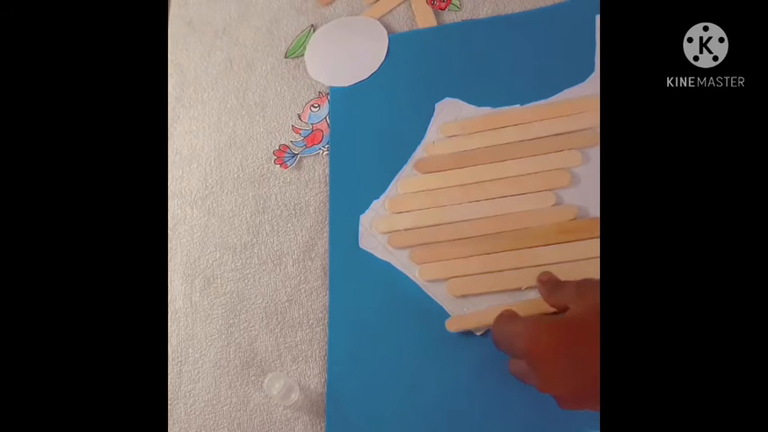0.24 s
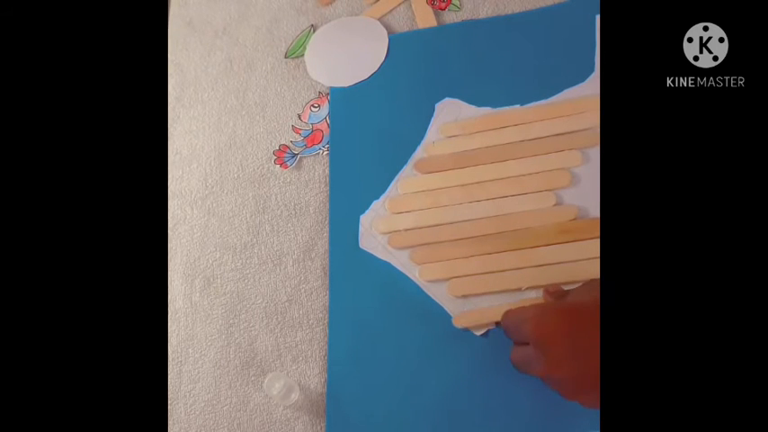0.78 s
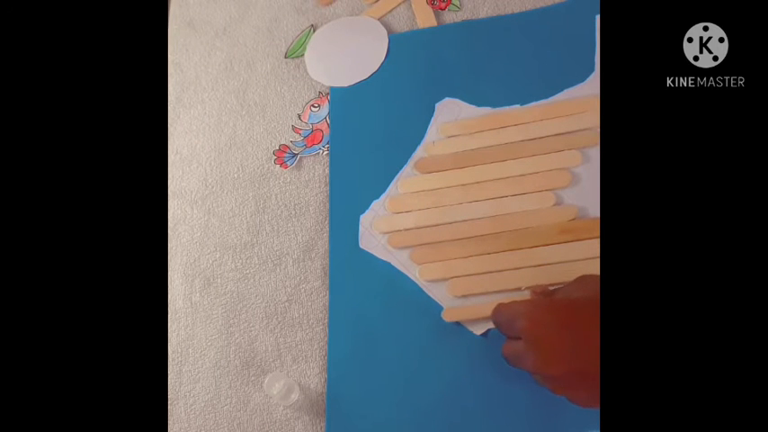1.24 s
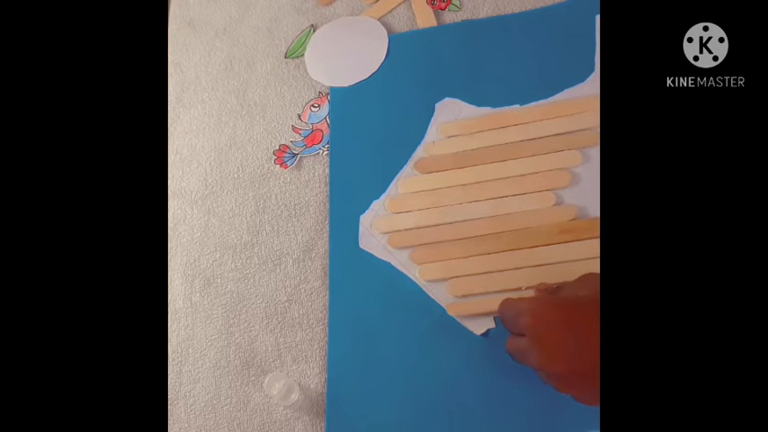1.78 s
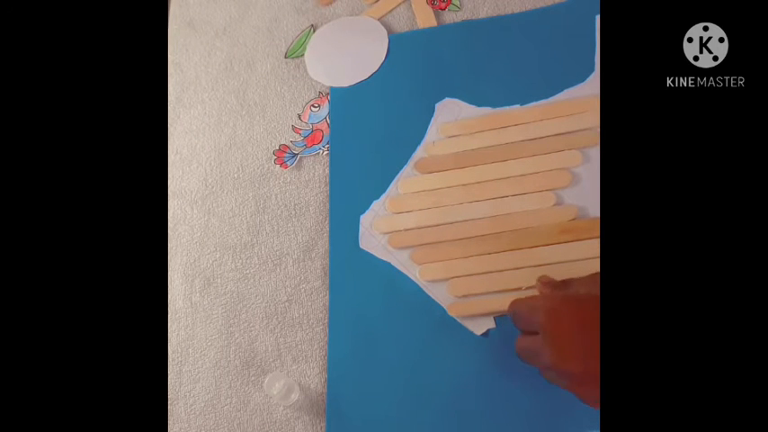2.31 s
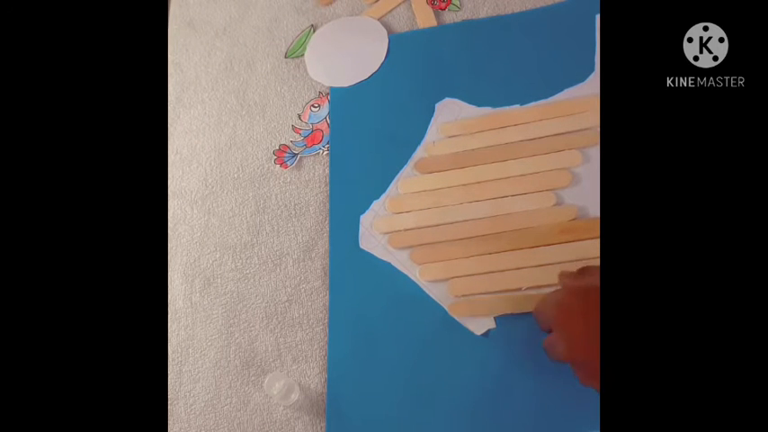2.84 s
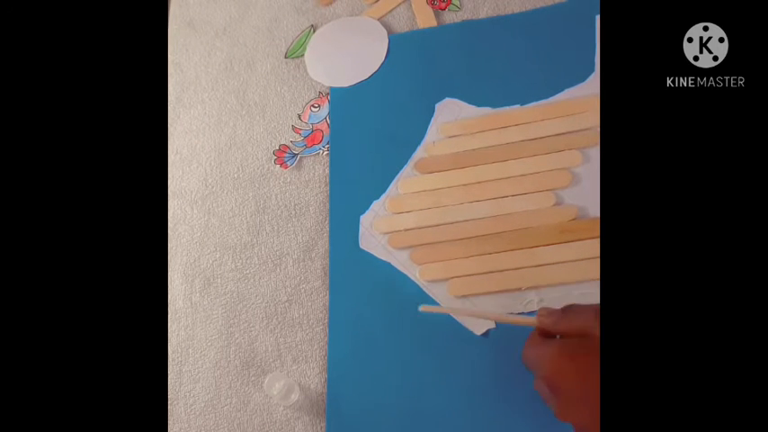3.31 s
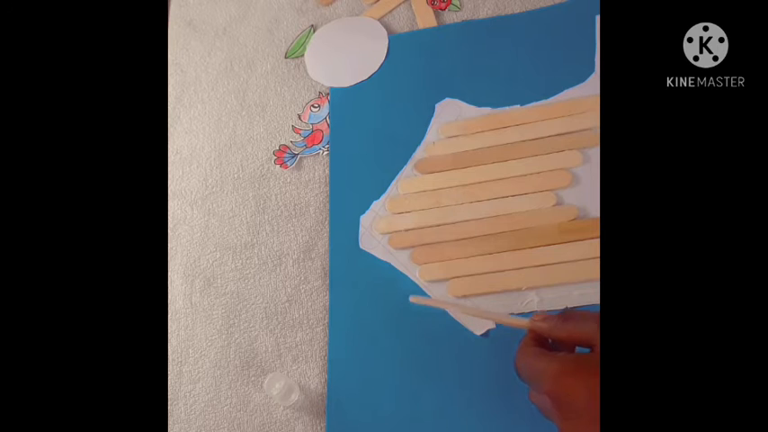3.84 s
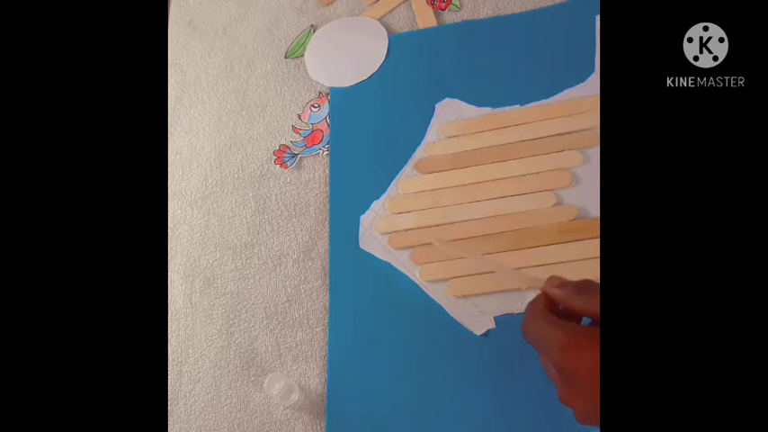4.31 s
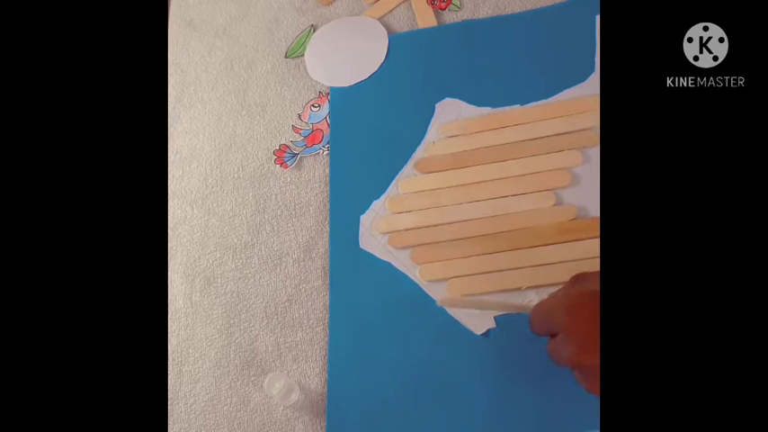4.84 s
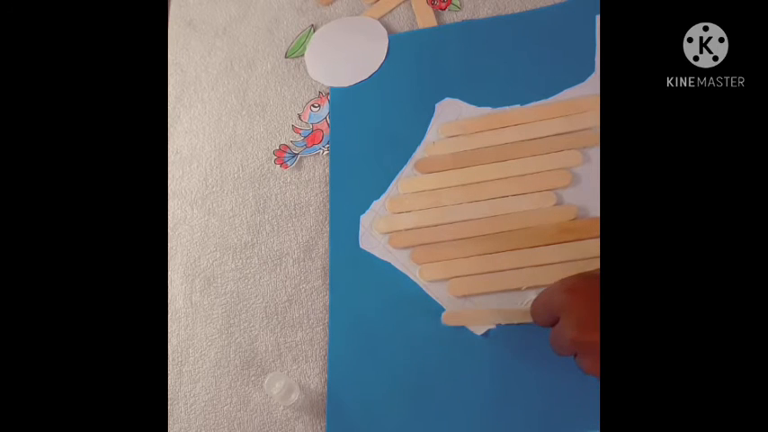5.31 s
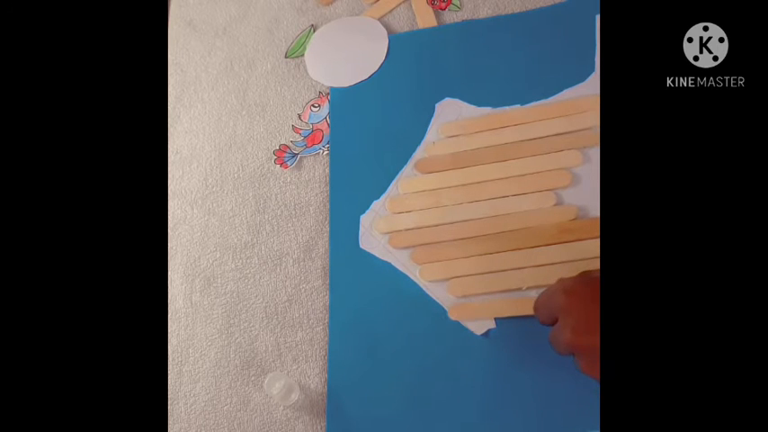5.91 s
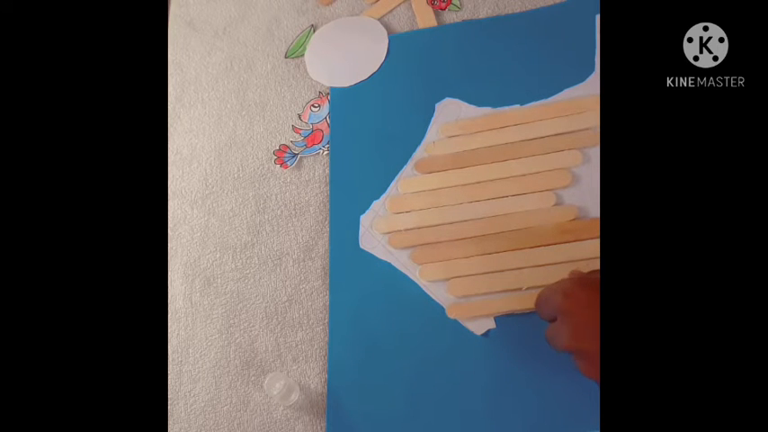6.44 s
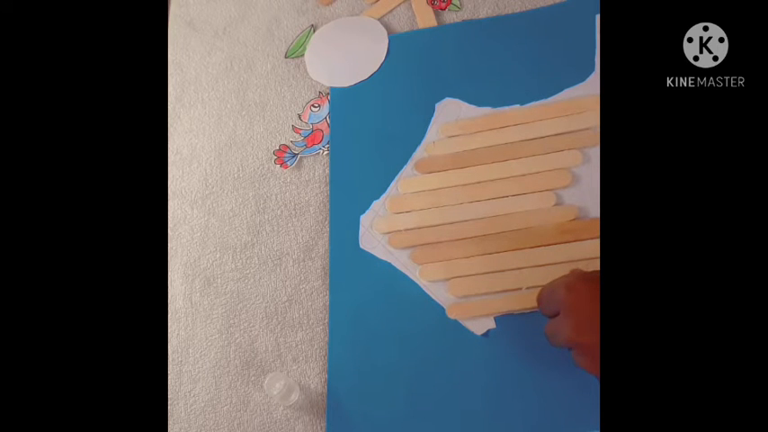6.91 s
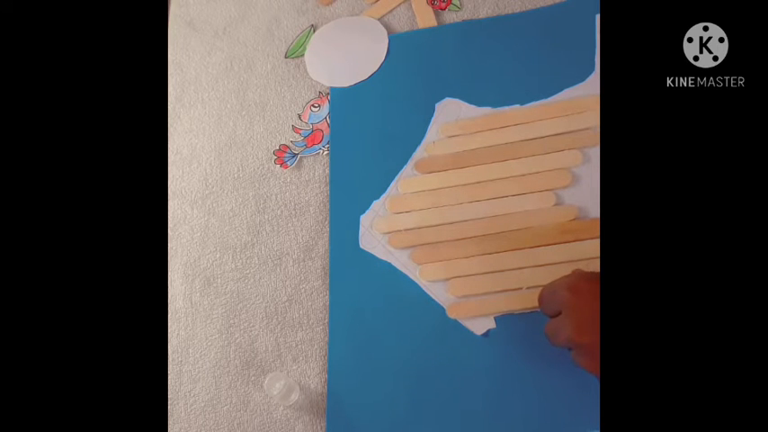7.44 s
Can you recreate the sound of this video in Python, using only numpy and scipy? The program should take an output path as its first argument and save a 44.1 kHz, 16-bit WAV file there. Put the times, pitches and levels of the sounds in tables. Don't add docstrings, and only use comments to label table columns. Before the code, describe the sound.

A steady raspy mains buzz with fan hiss and thin whine fills a quiet room while light wooden sticks scrape, click, tap and sharply snap.

```python
import sys
import numpy as np
from scipy import signal
from scipy.fft import rfft, irfft, next_fast_len
from scipy.io import wavfile
from scipy.ndimage import uniform_filter1d, map_coordinates

SR = 44100
rng = np.random.default_rng(int(sys.argv[2]) if len(sys.argv) > 2 else 0)


def convert_level_to_amplitude(level_db):
    exponent = np.asarray(level_db, float) / 20
    return 10 ** exponent


def master(y):
    cut = np.clip(np.atleast_2d(y).T, -1, 1)
    pcm = np.round(cut * 32767)
    wavfile.write(sys.argv[1], SR, pcm.astype(np.int16))


N = 338247


def unit(x):
    return x / np.sqrt(np.mean(x ** 2) + 1e-20)


def wobble(rate, size=N):
    knots = rng.standard_normal(int(size * rate / SR) + 4)
    return map_coordinates(knots, [np.arange(size) * rate / SR])


def filtered(x, response):
    m = next_fast_len(len(x) + 4096)
    return irfft(rfft(x, m) * response(np.fft.rfftfreq(m, 1 / SR)), m)[:len(x)]


def resonance(centre_hz, width_hz):
    return lambda f: 1j * f * width_hz / (centre_hz ** 2 - f * f + 1j * f * width_hz)


def shaped(points):
    hz, db = np.transpose(points)
    return lambda f: convert_level_to_amplitude(np.interp(np.log(f + 1), np.log(hz), db)) * np.sqrt(SR / 2)


def add(track, s, x):
    track[round(s * SR):][:len(x)] += x


def arch(length):
    return np.sin(np.pi * np.linspace(0, 1, round(length * SR)) ** .5) ** .65


def mains():
    # time_s, mains_hz
    drift = [(0, 49.9492), (1.4, 49.948), (3.3, 49.9469), (5, 49.9477), (7, 49.9493), (7.67, 49.9506)]
    start_cycle = .1045
    return start_cycle + np.cumsum(np.interp(np.arange(N) / SR, *np.transpose(drift))) / SR


def since(start_ms, jitter_ms):
    cycle = mains() + 1.02 - start_ms / 20
    late = jitter_ms * rng.standard_normal(int(cycle[-1]) + 1)
    return (cycle % 1 - .02) * 20 - late[cycle.astype(int)]


def during(start_ms, length_ms):
    ms = since(start_ms, 0)
    inside = (ms > 0) & (ms < length_ms)
    return uniform_filter1d(inside.astype(float), size=12)


def buzz():
    charge_ms = [19.04, 2.0, 10.62]
    # length_ms, size_mv, skew
    charge = [(3.39, 56.5, 0.72), (3.8, -47, 0.74), (4.06, 41.5, 0.71)]
    switch_ms = [18.972, 10.653, 2.34, 5.45, 15.41, 15.585, 12.332, .58, .85, 12.028, 1.448, 12.565, 15.8]
    # size_mv, rise_ms, decay_ms, jitter_ms
    spikes = [(-108, 0.039, 0.13, 0.0023), (-69, 0.043, 0.22, 0.0024), (81.5, 0.063, 0.15, 0.0028),
              (13, 0.025, 9.1, 0.049), (18, 0.0077, 0.071, 0.0057), (36, 0.044, 0.16, 0.006),
              (-18, .012, 0.031, 0.015), (-29, 0.058, 0.2, 0.0091), (-20, 0.056, 0.15, 0.0077),
              (-26, 0.045, 0.15, 0.01), (7, 0.012, 0.26, 0.013), (-22, 0.17, 11, 0.016),
              (-11, 0.03, 0.095, 0.011)]
    needle_ms = [2.335, 12.355, 1.83, 11.82, 1.485, 11.49, 5.43, 19.37]
    # size_mv, jitter_ms
    needles = [(-10.5, 0.016), (-12, 0.0064), (3.5, .008), (-1.5, 0.0068), (0, .008), (9, .008), (-4, .015),
               (-14.5, .01)]
    sine_mv, sine_crest_ms, needle_width_ms = 6.5, 8.19, .0094

    mv = sine_mv * np.cos(2 * np.pi * (mains() - sine_crest_ms / 20))
    for start, (length, size, skew) in zip(charge_ms, charge):
        share = np.clip(since(start, 0) / length, 0, 1)
        mv += size * np.sin(np.pi * share ** skew) ** 2
    for start, (size, rise, decay, jitter) in zip(switch_ms, spikes):
        ms = np.maximum(since(start, jitter), 0)
        mv += size * (1 - np.exp(-ms / rise)) ** 2 * np.exp(-ms / decay)
    for start, (size, jitter) in zip(needle_ms, needles):
        mv += size * np.exp(-(since(start, jitter) / needle_width_ms) ** 2)
    return (mv - mv.mean()) / 1000 * convert_level_to_amplitude(.15 * wobble(6))


def air():
    # pitch_hz, level_db per Hz
    fan = [(15, -78), (80, -79), (130, -72.5), (220, -70.5), (480, -70), (640, -79), (1050, -73.5),
           (1400, -81.5), (2300, -87), (4000, -95), (6500, -101), (10000, -105), (14000, -109),
           (16000, -110)]
    # pitch_hz, width_hz, lift_db
    room_modes = [(189, 29, 6.5), (251.5, 17, 5.5), (325, 14, 0), (340, 13, -1.5), (412.6, 4, 9.5),
                  (437, 8.8, -19), (495, 4.4, 5.5)]

    def colour(f):
        lift = sum(lift_db / (1 + (2 * (f - hz) / width) ** 2) for hz, width, lift_db in room_modes)
        return shaped(fan)(f) * convert_level_to_amplitude(lift)

    z = signal.stft(rng.standard_normal(N + 512), nperseg=512)[2]
    patches = uniform_filter1d(rng.standard_normal(z.shape), 5, 0)
    patches = uniform_filter1d(patches, 10, 1)
    noise = signal.istft(z * convert_level_to_amplitude(1.54 * unit(patches)), nperseg=512)[1][:N]
    return filtered(unit(noise), colour) * convert_level_to_amplitude(.051 * wobble(2.7))


def whines():
    # pitch_hz, width_hz, level_db
    whine_lines = [(13580, 8, -83), (13500, 8, -80), (15100, 28, -78), (15050, 35, -77), (14900, 40, -82),
                   (15300, 30, -80)]
    # pitch_hz, level_db per Hz
    hash_levels = [(3000, -112), (7000, -104), (11000, -106), (14200, -108), (14900, -101), (15500, -106)]
    # start_ms, length_ms
    busy = (10.6, 14.9)
    # start_ms, length_ms
    lull = (13.6, 5.3)
    lull_db = -6

    sound = filtered(rng.standard_normal(N), shaped(hash_levels)) * convert_level_to_amplitude(lull_db * during(*lull))
    for hz, width, db in whine_lines:
        sound += convert_level_to_amplitude(db) * unit(filtered(rng.standard_normal(N), resonance(hz, width)))
    return sound * (.03 + during(*busy))


def rubbed(rows, width, grit_db):
    out = np.zeros(N)
    for s, length, hz, db in rows:
        shape, band = arch(length), resonance(hz, width * hz)
        grains = convert_level_to_amplitude(grit_db * wobble(450, size=len(shape))) * rng.standard_normal(len(shape))
        add(out, s, convert_level_to_amplitude(db) * shape * unit(filtered(grains, lambda f: band(f) ** 2)))
    return out


def scrapes():
    # start_s, length_s, centre_hz, level_db
    edge_scrapes = [(.091, .16, 6800, -59.5), (.1, .06, 10200, -60), (.298, .08, 2750, -47.5),
                    (.65, .09, 6960, -59), (2.7, .04, 4200, -59), (2.726, .017, 5500, -53),
                    (2.94, 0.079, 7100, -57), (2.986, .012, 3960, -44), (2.984, .014, 5900, -51),
                    (2.982, 0.03, 8500, -55), (3.04, 0.035, 3780, -53), (3.05, .02, 6800, -57),
                    (4.27, 0.058, 493, -43.5), (5.94, .076, 6500, -64)]
    return rubbed(edge_scrapes, width=.3, grit_db=2.5)


def contact(t60_ms):
    t = np.arange(SR // 25) / SR
    blow = .07 * rng.standard_normal(len(t)) * convert_level_to_amplitude(-60 * t / (t60_ms / 1000))
    blow[0] = -1
    return blow


def struck(rows, ratio, high_db, width):
    out = np.zeros(N)
    for s, db, hz, t60_ms in rows:
        blow = contact(t60_ms)
        damping_hz = 4500 / t60_ms
        high_hz = ratio * hz
        low_ring = resonance(hz, width * hz + damping_hz)
        high_ring = resonance(high_hz, .78 * width * high_hz + damping_hz)
        low = filtered(blow, lambda f: low_ring(f) ** 2)
        high = filtered(blow, lambda f: high_ring(f) ** 2)
        add(out, s, convert_level_to_amplitude(db) * (low / np.abs(low).max() - convert_level_to_amplitude(high_db) * high / np.abs(high).max()))
    return out


def clicks():
    # start_s, peak_db, ring_hz, t60_ms
    end_clicks = [(.2552, -42, 7300, 4), (2.638, -35, 2700, 7.3), (2.729, -38.5, 5700, 9.7),
                  (2.799, -42, 4300, 8), (2.866, -42, 4400, 10), (3.16, -45, 4000, 8),
                  (4.9653, -28, 6400, 3), (5.36, -42, 4000, 6), (5.406, -39, 5500, 6),
                  (5.596, -36, 4300, 6), (5.78, -46, 4600, 10), (5.968, -46, 4500, 8),
                  (6.008, -45, 4500, 10)]
    return struck(end_clicks, ratio=1.15, high_db=-4, width=.13)


def knocked(rows, modes, contact_hz):
    def body(f):
        rings = sum(convert_level_to_amplitude(level_db) * resonance(hz, width)(f) for hz, width, level_db in modes)
        return rings / (1 + 1j * f / contact_hz) ** 2

    out = np.zeros(N)
    for s, db, t60_ms in rows:
        ring = filtered(contact(t60_ms), body)
        add(out, s, convert_level_to_amplitude(db) * ring / np.abs(ring).max())
    return out


def knocks():
    # start_s, peak_db, t60_ms
    bounces = [
        (.2823, -17, 16),
        (.2945, -30, 8),
        (.3011, -19.5, 20),
    ]
    # pitch_hz, width_hz, level_db
    laid_stick = [(1060, 350, -2), (1700, 400, 3), (2350, 390, -4), (2900, 450, -6.5), (5600, 1400, -15),
                  (7100, 1200, -11)]
    return knocked(bounces, laid_stick, contact_hz=5000)


def squeaks():
    # start_s, length_s, pitch_hz, level_db
    far_squeaks = [(.65, .12, 9870, -62), (.65, .095, 10330, -59), (.75, .09, 10330, -65),
                   (.655, .065, 15400, -67), (.665, .065, 2040, -54), (.74, .19, 1990, -58),
                   (1.18, .19, 10330, -66), (1.23, .09, 9870, -70), (6.76, .11, 10500, -70),
                   (7.16, .15, 1850, -54), (7.35, .045, 1860, -55), (7.42, .05, 2450, -60)]
    waver_hz = 30
    out = np.zeros(N)
    for s, length, hz, db in far_squeaks:
        shape = arch(length)
        pitch = hz + waver_hz * wobble(120, size=len(shape))
        tone = np.sin(2 * np.pi * np.cumsum(pitch) / SR)
        tone = tone * convert_level_to_amplitude(3 * wobble(70, size=len(shape)))
        add(out, s, convert_level_to_amplitude(db) * shape * unit(tone))
    return out


def slides():
    # start_s, length_s, centre_hz, level_db
    card_slides = [
        (2.599, 0.58, 2700, -56),
        (2.722, .035, 3500, -51),
        (2.864, .036, 7000, -58),
        (3.036, .053, 3480, -49.5),
        (4.265, .071, 3100, -53),
        (4.5, 0.17, 2600, -55),
        (5.39, 0.045, 2800, -58),
        (5.63, .13, 4500, -58),
        (5.98, .1, 2800, -60),
        (6.14, .045, 2600, -47),
    ]
    return rubbed(card_slides, width=1.01, grit_db=2.2)


def taps():
    # start_s, peak_db, ring_hz, t60_ms
    flat_taps = [
        (2.729, -33, 2150, 18),
        (4.279, -40, 1900, 8),
        (4.481, -35, 2600, 5),
        (5.021, -45, 3200, 4),
        (5.402, -32, 2700, 8),
    ]
    return struck(flat_taps, ratio=3.7, high_db=-16, width=.36)


def snaps():
    # start_s, peak_db, ring_hz
    glue_snaps = [
        (4.9655, -17.5, 3050),
        (6.6576, -15.5, 2680),
    ]
    width, edge_hz, edge_db = .8, 12000, -24

    out, impulse = np.zeros(N), -1. * (np.arange(400) == 0)
    for s, db, hz in glue_snaps:
        def swing_response(f):
            swing = resonance(hz, width * hz)(f) / (1 + 1j * f / 12000)
            swing = swing * 1j * f / (900 + 1j * f)
            return swing + convert_level_to_amplitude(edge_db) * resonance(edge_hz, 9000)(f)

        swing = filtered(impulse, swing_response)
        add(out, s, convert_level_to_amplitude(db) * swing / np.abs(swing).max())
    return out


def clacks():
    # start_s, peak_db, t60_ms
    stick_clacks = [
        (6.1255, -30, 10),
        (6.137, -23, 22),
        (6.141, -29, 8),
    ]
    # pitch_hz, width_hz, level_db
    held_stick = [(2440, 350, 4), (4200, 330, 2), (6800, 900, 1.5), (9200, 800, -11)]
    return knocked(stick_clacks, held_stick, contact_hz=10000)


def with_table(contacts):
    size, t60_s = SR // 10, .19
    echo = filtered(rng.standard_normal(size), resonance(3600, 4000))
    echo = echo * convert_level_to_amplitude(-60 * np.arange(size) / SR / t60_s)
    delayed = np.pad(contacts, (60, 0))
    return contacts + convert_level_to_amplitude(-22.0) * signal.fftconvolve(delayed, echo / np.linalg.norm(echo))[:N]


def scene():
    room = buzz() + air() + whines()
    contacts = clicks() + knocks() + taps() + snaps() + clacks()
    hand = scrapes() + slides() + with_table(contacts)
    return (room + hand + squeaks())[None]


def top_cut(x):
    return signal.sosfilt(signal.butter(12, 15790, fs=SR, output="sos"), x)


def record(dry):
    top_hz = 15430
    kept = filtered(dry[0], lambda f: convert_level_to_amplitude(-30 * np.clip((f - top_hz) / 120, 0, 1)))
    return top_cut(kept[None])


dry = scene()
out = record(dry)
master(out)
```